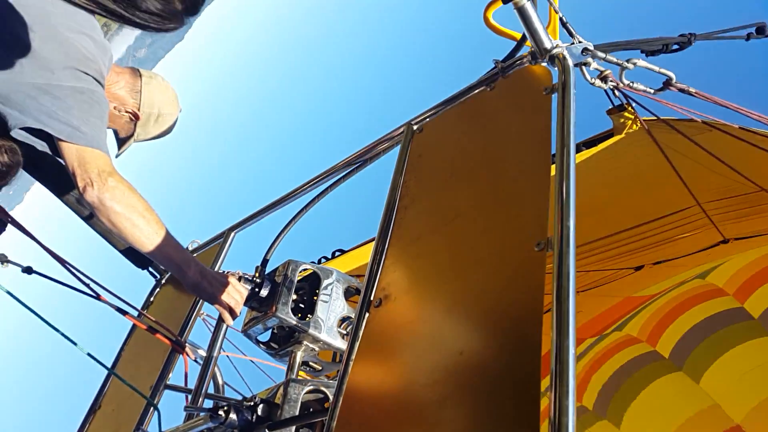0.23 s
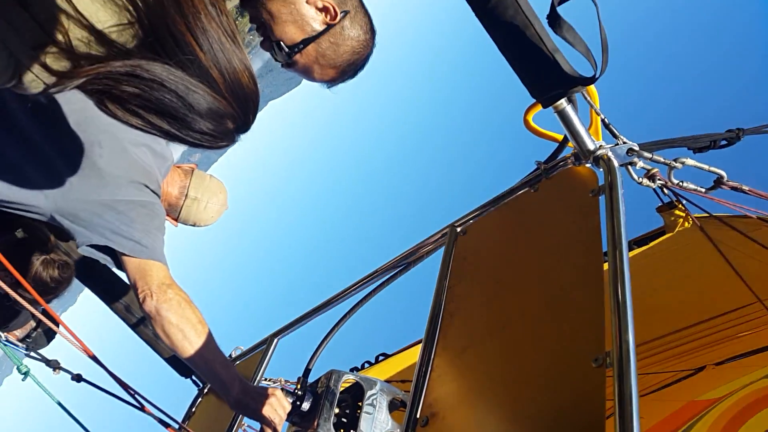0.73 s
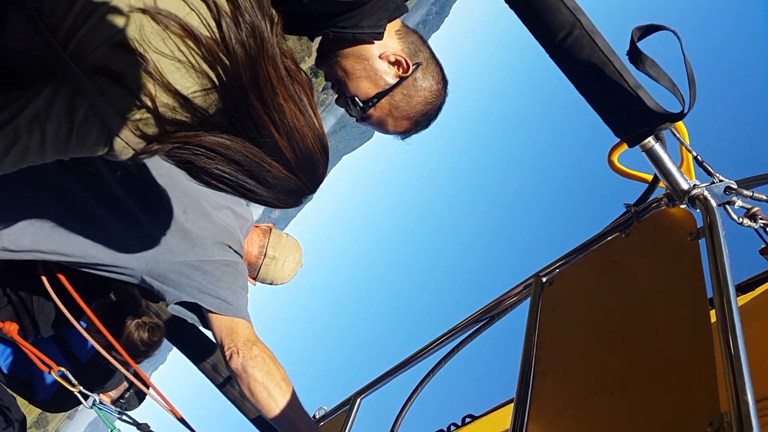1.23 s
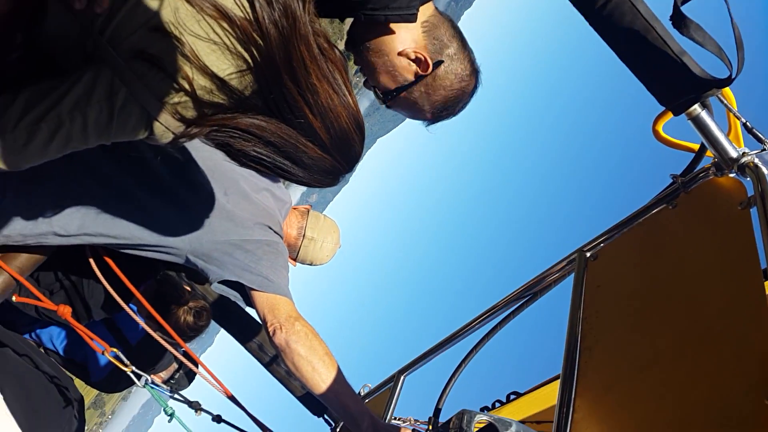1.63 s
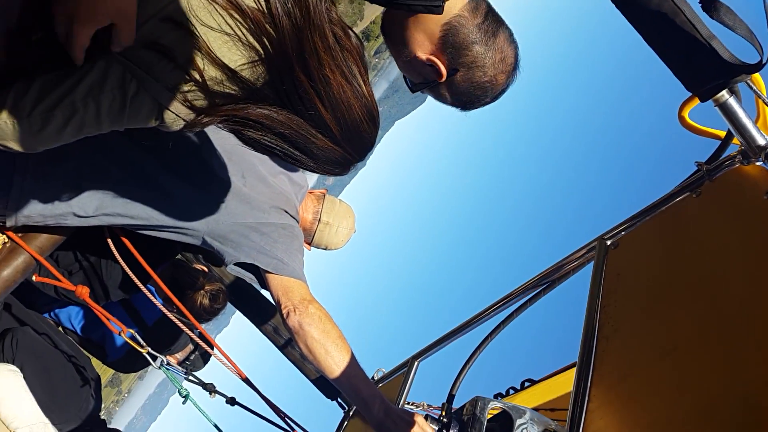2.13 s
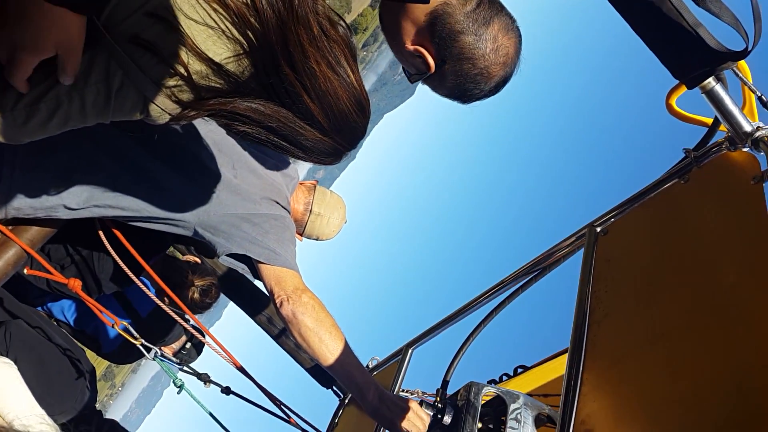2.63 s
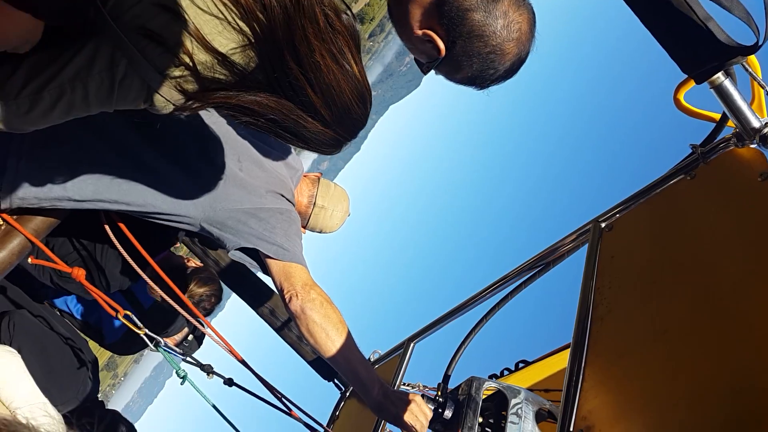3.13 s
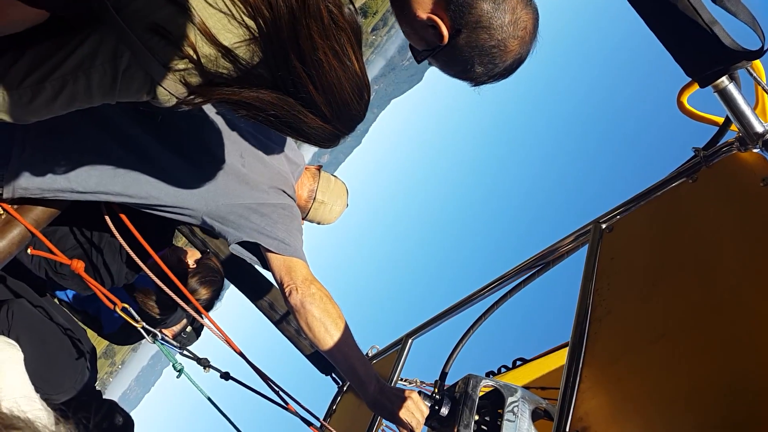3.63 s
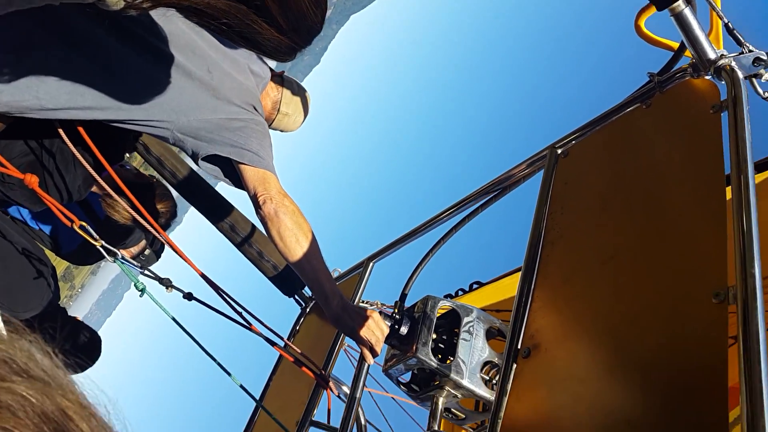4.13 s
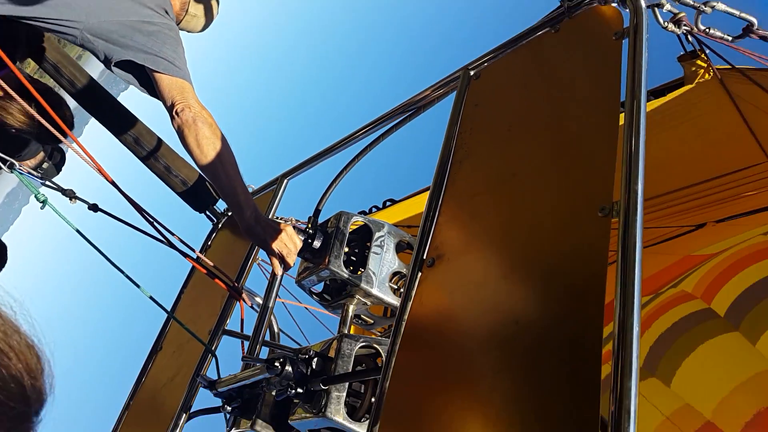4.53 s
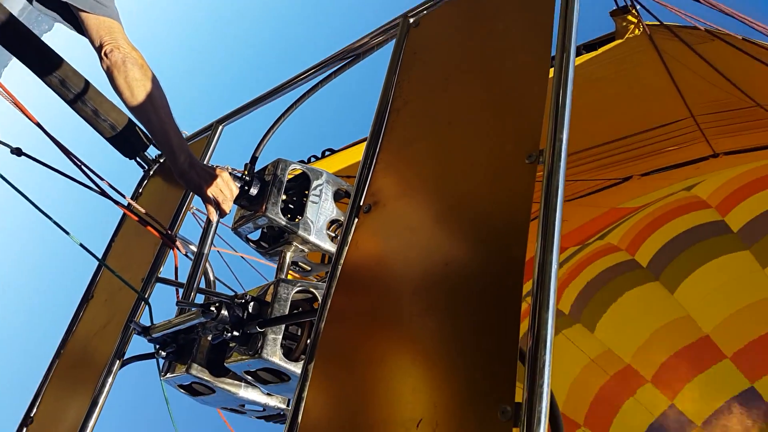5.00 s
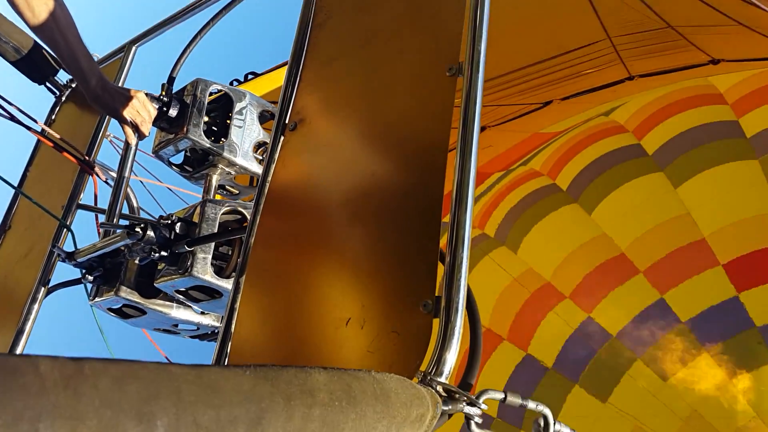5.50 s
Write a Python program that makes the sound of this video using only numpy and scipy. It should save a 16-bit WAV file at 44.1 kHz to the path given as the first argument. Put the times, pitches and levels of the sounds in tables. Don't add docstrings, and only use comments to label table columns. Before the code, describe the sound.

A propane burner fires close overhead in a balloon basket, in open air without echo. At 0 s gas lights with a low double thump and a dense, low roar, uneven and fluttering, under broad jet hiss. Around 0.5 s it dies within a fraction of a second, leaving a much fainter pilot-flame rumble with a thin high nozzle whistle. At about 0.77 s a second blast rises almost instantly, without a thump, and holds until roughly 2.15 s. The next pause is longer: afterburn fades, the small flame murmurs, then it and a breathy seep of gas swell shortly before 3.26 s. At 3.3 s pooled gas ignites with a thump, a flare and a momentary dip, and the third roar continues unbroken to the end near 5.8 s, its hiss changing as the microphone turns toward the burner after 4 s. Right side bright and hissy, left side dull.

```python
import sys
import numpy as np
from scipy import signal
from scipy.fft import rfft, irfft
from scipy.io import wavfile
from scipy.ndimage import uniform_filter1d

SR = 44100
rng = np.random.default_rng(int(sys.argv[2]) if len(sys.argv) > 2 else 0)


def invert_db(level):
    return 10 ** (np.asarray(level, dtype=float) / 20)


def bounce(signal):
    frames = np.transpose(np.atleast_2d(signal))
    limited = np.clip(frames, -1, 1)
    pcm = np.round(limited * 32767).astype(np.int16)
    wavfile.write(sys.argv[1], SR, pcm)


N = 254016
HZ = np.maximum(np.fft.rfftfreq(N, 1 / SR), 1.)
STEPS_S = np.arange(0, N + 32, 32) / SR


# [opens/s, shuts/s, level/dB, share of pooled gas cloud to light/0-1]
VALVE_PULLS = [
    (-.027, 0.4558, -0.68, .8),
    (.768, 2.117, 0.0448, 0.0),
    (3.264, 6.5, 0.21, .95),
]
LAYER_VALVE_LAW = {"roar": (-20.5, 28, 0.0133, 0.0905, 0.0269, 351),
                   "rush": (-40.5, 24, .015, 0.0455, 0.0187, 270.5),
                   "valley": (-53.5, 27.5, .035, 0.0278, 0.0231, 269),
                   "shoulder": (-52.5, 40, .04, .05, .04, 380),
                   "low": (-39.2, 40, 0.0282, 0.0391, 0.0364, 390.5),
                   "middle": (-35, 40, 0.0259, 0.0512, 0.0482, 399.5),
                   "top": (-33.5, 47, 0.0252, 0.0427, .042, 410)}
# [t/s, facing/0-1]
MIC_FACING = [(0, 1.05), (.45, 0.89), (.9, 0.25), (1.5, 0.0), (2.1, 0.09), (3.3, .15), (4.1, 0.0),
              (4.45, .7), (5.1, 1.01), (5.4, 1), (5.76, 0.96)]
FACED_CHANGE_DB = {"roar": -1.53, "rush": -1.33, "valley": -3, "shoulder": 4.2, "low": 1.5, "middle": -6.5,
                   "top": 3.5}


def burn(layer, settles=0., flares=0.):
    full_db, under_db, rise_s, burns_on_s, knee_s, fall_db_per_s = LAYER_VALVE_LAW[layer]
    settle_db, settle_s = 3.8, .15
    sag_db, sag_s = 4.5, .22
    flash_db, flash_s, flash_width_s = 4, 0.033, 0.013
    lull_db, lull_s, lull_width_s = -7.5, 0.0964, .028
    t, gain = STEPS_S, 0
    for opens_s, shuts_s, level_db, cloud in VALVE_PULLS:
        since_s = np.maximum(t - opens_s, 0)
        rise_db = -under_db * np.exp(-since_s / rise_s)
        fall_db = -fall_db_per_s * ramp(t - shuts_s - burns_on_s, knee_s)
        unsettled_db = settle_db * np.exp(-since_s / settle_s)
        easing_db = sag_db * np.exp(np.minimum(t - shuts_s, 0) / sag_s)
        flare_db = flash_db * np.exp(-((since_s - flash_s) / flash_width_s) ** 2)
        starved_db = lull_db * np.exp(-((since_s - lull_s) / lull_width_s) ** 2)
        db = level_db + rise_db + fall_db - settles * (unsettled_db + easing_db)
        db = db + flares * cloud * (flare_db + starved_db)
        gain = gain + invert_db(db) * (t >= opens_s)
    facing = np.interp(t, *np.transpose(MIC_FACING))
    return smooth_gain(gain * invert_db(full_db + FACED_CHANGE_DB[layer] * facing), size=6)


# [f/Hz, density/dB]
ROAR_SPECTRUM = [(12, -53), (20, -26), (97, -9.5), (129, -1.5), (211, -3), (264, -1), (426, -10.5),
                 (454, -9), (515, -18), (614, -29), (900, -24.5), (1170, -55.5), (1980, -120)]


def roar(gain, surge):
    sizes = invert_db(2.77 * np.minimum(rng.exponential(1, N), 4)) * rng.choice([-1, 1], N)
    pops = rms_one(sizes * (rng.random(N) < 400 / SR))
    turbulence_db = 0.74 * drift(22.4) + 0.8 * surge
    drive = (0.533 * pops + 0.885 * rng.standard_normal(N)) * invert_db(turbulence_db)
    colour_db = at_hz(ROAR_SPECTRUM)
    return gain * rms_one(irfft(at_ports(drive, colour_db - 1.2, colour_db, 1.0), N))


# [f/Hz, level/dB]
JET_LEFT = [(500, 5), (800, -15.5), (1100, -10.5), (1500, -18.5), (2400, -21.5), (3350, -27), (3900, -22),
            (4500, -24), (5100, -23), (6250, -35.5), (6700, -36.5), (9000, -39), (11000, -28.5),
            (14500, -20)]
# [f/Hz, level/dB]
JET_RIGHT = [(560, -5), (800, 0.5), (1000, -9), (1300, -5.5), (2000, -8.5), (3150, -10.5), (3600, -20.5),
             (4200, -16.5), (4700, -23.5), (5100, -19.5), (5500, -19), (6600, -10.5), (8000, -4.5),
             (14500, -4)]
# [f/Hz, likeness/0-1]
PORT_LIKENESS = [(300, 0.83), (640, 0.69), (1400, 0.44), (3000, .35), (6000, 0.042)]


def hiss(rush, jets, surge):
    notch_db = -11 * np.exp(-((HZ - 4720) / 140) ** 2)
    left_db, right_db = at_hz(JET_LEFT) + notch_db, at_hz(JET_RIGHT) + notch_db / 3
    ports = at_ports(rng.standard_normal(N), left_db, right_db, at_hz(PORT_LIKENESS))
    rush_noise = rms_one(irfft(ports * band(547.8, 3061), N))
    out = invert_db(2.0 + .6 * surge + 0.44 * drift(30)) * rush * rush_noise

    edges_hz = (3356.7, 5200, 6900, 9522, 12755, 17500)
    for gain, low_hz, high_hz in zip(jets, edges_hz, edges_hz[1:]):
        region = rms_one(irfft(ports[1] * band(low_hz, high_hz), N))
        out[1] += invert_db(.4 * surge + .5 * drift(19)) * gain * region * 2

    middle = rms_one(irfft(ports[0] * band(3300, 7400), N))
    middle_gain = np.sqrt(np.abs(rush * jets[0]))
    out[0] += invert_db(-5.2 + .5 * surge + 1.5 * drift(6)) * middle_gain * middle
    top_band = band(6000, 18000) * (1 - .45 * band(7250, 9500))
    top = rms_one(irfft(ports[0] * top_band, N))
    out[0] += invert_db(-19.5 + .5 * surge) * jets[1:].sum(axis=0) * top
    return out


# [t/s, peak/dB, f/Hz, sign]
IGNITIONS = [
    (.0095, -7, 150, -1),
    (.0235, -5, 170, 1),
    (3.2975, -9, 200, 1),
    (3.3055, -4, 180, 1),
]


def thumps():
    out, t = np.zeros(N), np.arange(round(.03 * SR)) / SR
    for start_s, peak_db, hz, sign in IGNITIONS:
        pulse = np.sin(2 * np.pi * hz * t) * np.exp(-1.3 * hz * t) * 1.45
        out[round(start_s * SR):][:len(t)] += sign * invert_db(peak_db) * pulse
    return signal.sosfilt(signal.butter(2, 700, fs=SR, output="sos"), out)


def between_blasts(after_db, dies_db_per_s, quiet_db, swell_s, swells_db_per_s):
    t, gain = STEPS_S, 0
    for (_, shuts_s, *_), (opens_s, *_) in zip(VALVE_PULLS, VALVE_PULLS[1:]):
        since_s = np.clip(t - shuts_s, 0, opens_s - shuts_s)
        afterburn = invert_db(after_db - dies_db_per_s * since_s)
        swell = invert_db(quiet_db + swells_db_per_s * ramp(since_s - swell_s, knee_s=.04))
        heard = (since_s > .14) * (t < opens_s + .03)
        gain = gain + (afterburn + swell) * heard
    return smooth_gain(gain, size=12)


# [f/Hz, level/dB]
FLAME_LEFT = [(40, -23), (70, -2), (150, -2.5), (300, -5.5), (500, -9.0), (900, -10.5), (1200, -12.5),
              (1600, -27.5), (3000, -47.0), (3900, -28.5), (4900, -41), (6000, -59.5), (15000, -66)]
# [f/Hz, level/dB]
FLAME_RIGHT = [(40, -14.5), (70, -2.5), (150, -2), (300, -3.5), (500, -13.5), (900, -9), (1200, -15.5),
               (1600, -13.5), (2400, -34.5), (3000, -47.5), (3600, -31), (6000, -79.5), (15000, -58)]
# [f/Hz, width/Hz, level/dB]
NOZZLE_WHISTLES = [(9920, 190, -1), (11600, 250, 6), (12900, 2300, -10), (8120, 1200, -11.5)]
# [f/Hz, width/Hz, level/dB]
SEEP_PEAKS = [(1003, 780, 0.54), (4600, 1300, -27)]
FLAME_PAUSE = (-47, 66.5, -66, 0.59, 36)
WHISTLE_PAUSE = (-70.5, 80.5, -107, .69, 79)
LINE_PAUSE = (-74, 65, -100, 3.0, 0.1)
SEEP_PAUSE = (-140, 0.6, -84, .72, 80)


def pilot():
    likeness = 1.127 * at_hz(PORT_LIKENESS)
    flame = at_ports(rng.standard_normal(N), at_hz(FLAME_LEFT), at_hz(FLAME_RIGHT), likeness)
    gas = rfft(rng.standard_normal((2, N)))
    shadow = invert_db(np.array([[-24.], [0]]))
    whistle = gas * peaks(NOZZLE_WHISTLES) * shadow
    sigh = gas * band(4500, 15000) * np.sqrt(shadow) * 6000 / HZ
    seep = gas * peaks(SEEP_PEAKS) * band(100, 5400)
    out = between_blasts(*FLAME_PAUSE) * invert_db(0.96 * drift(17)) * rms_one(irfft(flame, N))
    out += between_blasts(*WHISTLE_PAUSE) * rms_one(irfft(whistle, N))
    out += between_blasts(*LINE_PAUSE) * rms_one(irfft(sigh, N))
    out += between_blasts(*SEEP_PAUSE) * rms_one(irfft(seep, N))
    return out


def at_ports(common, left_db, right_db, alike):
    alike = np.clip(alike, 0, 1)
    own = rfft(rng.standard_normal((2, N)))
    lag = np.exp(-2j * np.pi * HZ * 0.0002)
    shared = rfft(rms_one(common)) * np.array([lag, np.ones(len(HZ))])
    return (np.sqrt(alike) * shared + np.sqrt(1 - alike) * own) * invert_db(np.array([left_db, right_db]))


def drift(rate_hz):
    return rms_one(irfft(rfft(rng.standard_normal(N)) / (1 + (HZ / rate_hz) ** 2), N))


def rms_one(x):
    return x / np.sqrt(np.mean(np.atleast_2d(x).mean(axis=0) ** 2) + 1e-20)


def at_hz(points):
    hz, value = np.transpose(points)
    return np.interp(np.log(HZ), np.log(hz), value)


def band(low_hz, high_hz):
    return 1 / np.sqrt((1 + (low_hz / HZ) ** 30) * (1 + (HZ / high_hz) ** 30))


def peaks(table):
    return sum(invert_db(db) / (1 + (2 * (HZ - hz) / width_hz) ** 2) for hz, width_hz, db in table)


def ramp(t, knee_s):
    return knee_s * np.logaddexp(0, t / knee_s)


def smooth_gain(gain, size):
    return np.interp(np.arange(N) / SR, STEPS_S, uniform_filter1d(gain, size=size))


def scene():
    jet_names = ("shoulder", "low", "middle", "top")
    jets = np.array([burn("valley")] + [burn(name, settles=1) for name in jet_names])
    surge = drift(4.1)
    blasts = roar(burn("roar", flares=1), surge) + hiss(burn("rush"), jets, surge)
    return blasts + thumps() + pilot()


def top_cut(x):
    return signal.sosfilt(signal.butter(12, 15880, fs=SR, output="sos"), x)


def record(dry):
    noisy = dry + invert_db(-93.5) * rng.standard_normal(dry.shape)
    mix = signal.sosfilt(signal.butter(3, 45, "high", fs=SR, output="sos"), noisy)
    return top_cut(mix)


dry = scene()
out = record(dry)
bounce(out)
```